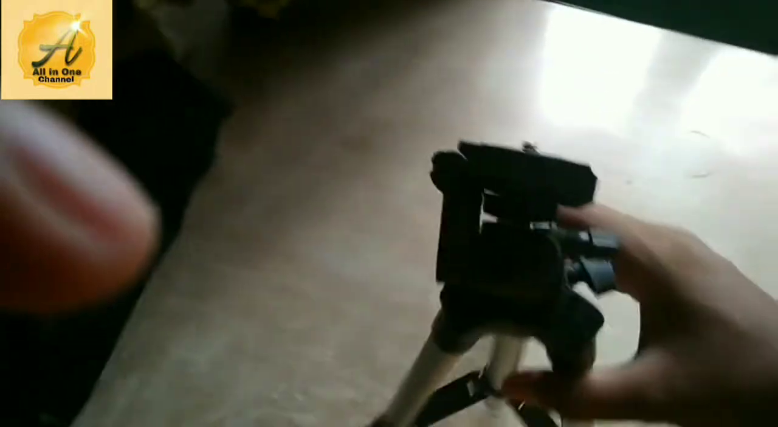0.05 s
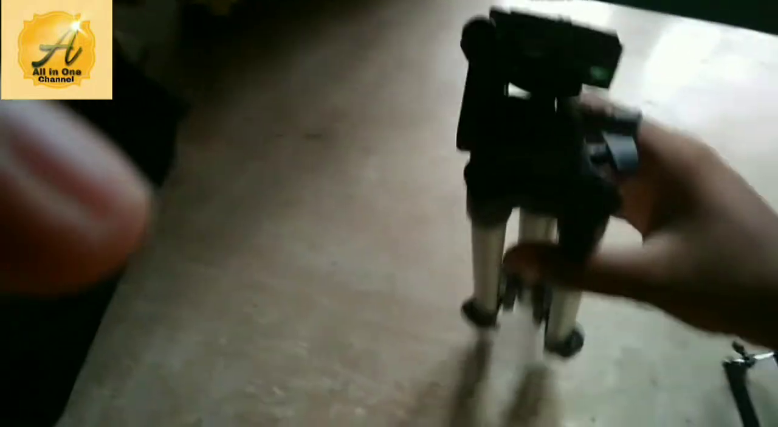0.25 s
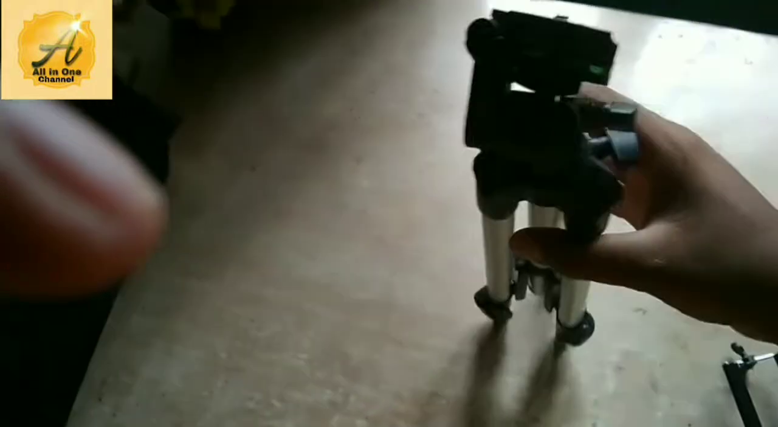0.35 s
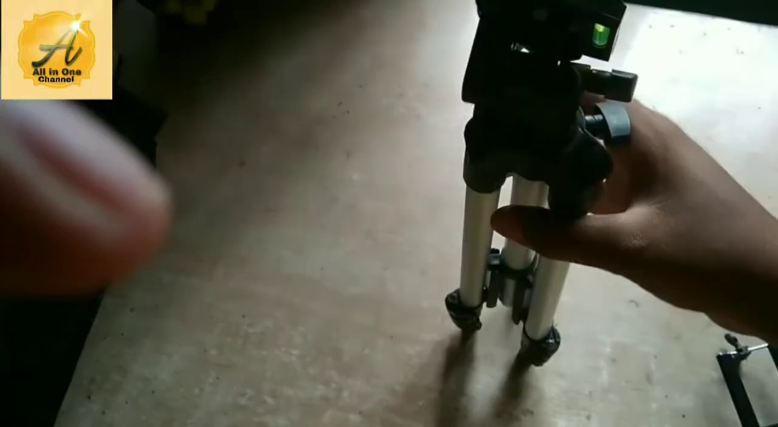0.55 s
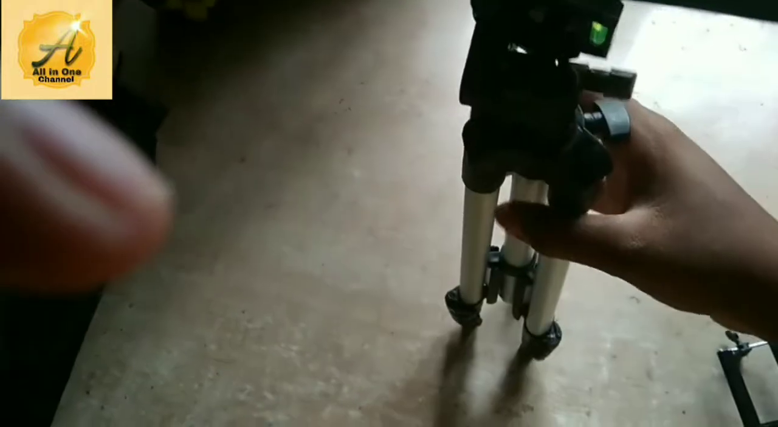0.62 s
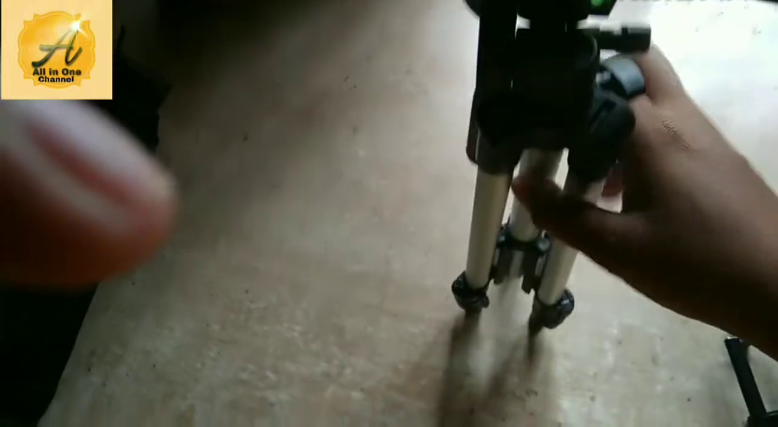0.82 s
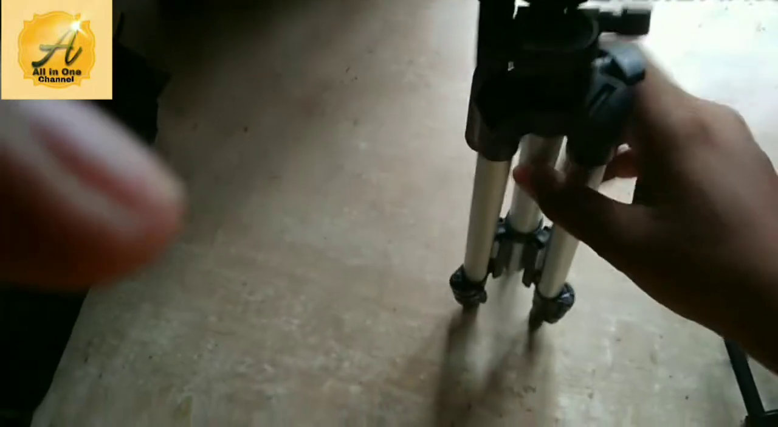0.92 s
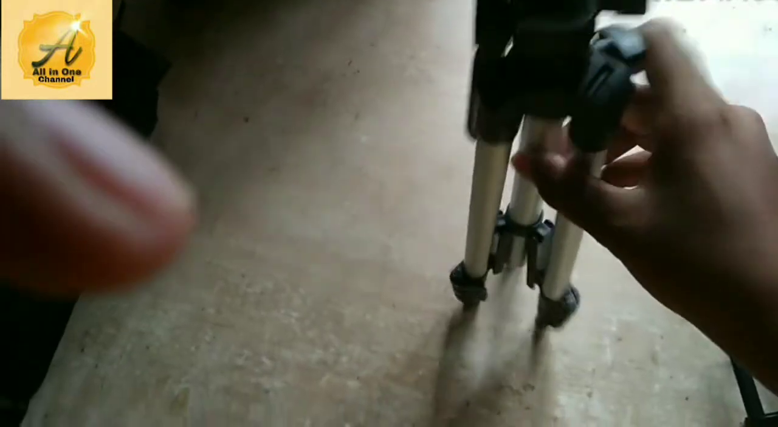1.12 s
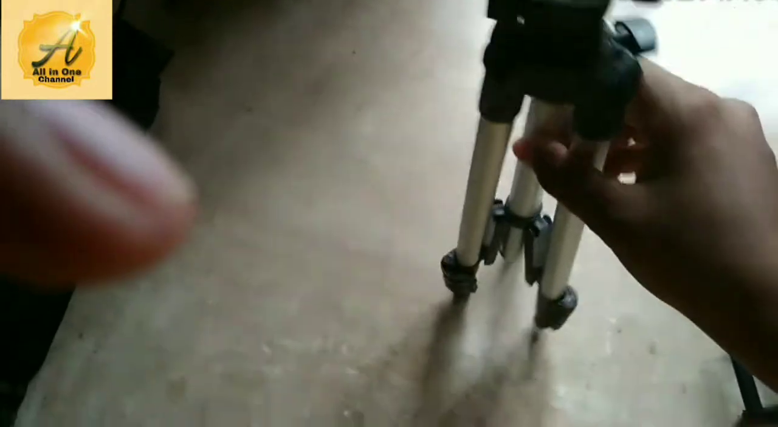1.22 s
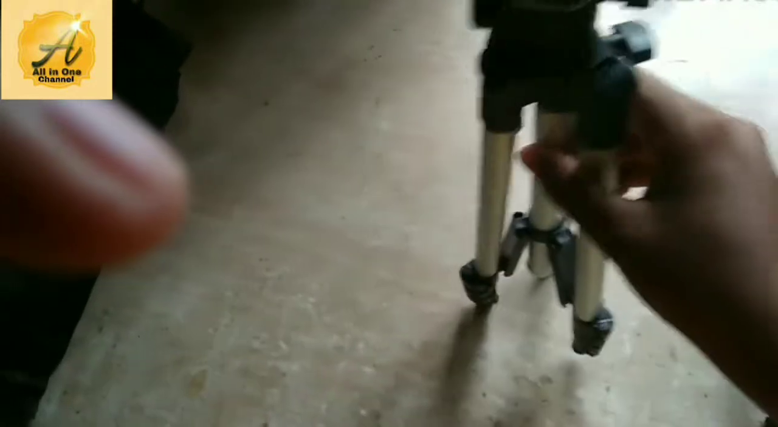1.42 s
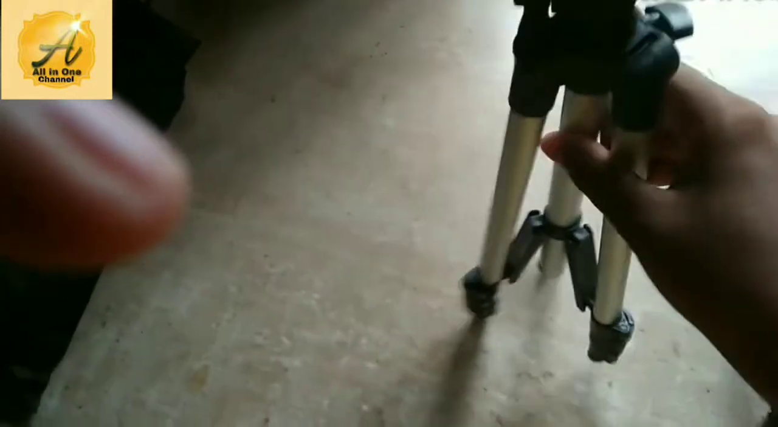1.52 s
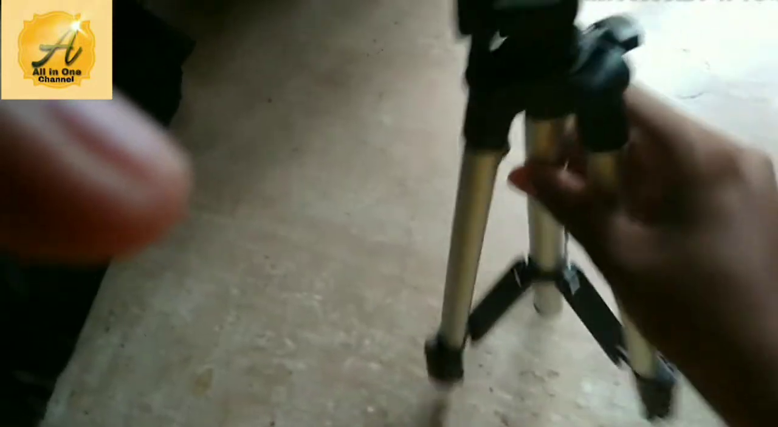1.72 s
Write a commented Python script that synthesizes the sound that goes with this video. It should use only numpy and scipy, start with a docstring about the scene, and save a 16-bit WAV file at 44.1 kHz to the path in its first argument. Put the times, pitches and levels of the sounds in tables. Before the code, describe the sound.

Tripod feet knock repeatedly onto a tabletop in a quiet room, with faint chirps outside.

```python
"""A small tripod is folded and stood on a table in a quiet room.
It sways and scrapes in the hand, then its metal legs clack together. The rubber feet thump down
repeatedly, loose joints tick and the table top booms until the hand's grip stills it.
A bird outside gives two falling chirps, with a soft bump and more scraping around the second.
Mains hum, buzzing hiss and a thin whine lie underneath throughout."""
import sys
import numpy as np
from scipy import signal
from scipy.fft import rfft, irfft, next_fast_len
from scipy.io import wavfile

SR = 44100
rng = np.random.default_rng(int(sys.argv[2]) if len(sys.argv) > 2 else 0)


def store_wav(level_fs):
    """Save 16-bit WAV to argv[1]."""
    pcm = np.round(np.clip(np.atleast_2d(level_fs), -1, 1) * 32767)
    wavfile.write(sys.argv[1], SR, pcm.T.astype(np.int16))


N = 77175
T = np.arange(N) / SR

# foot landings: (time [s], thud level [dB], thud pitch [Hz], table level [dB], contact [s])
LANDINGS = [(0.233, -15, 72.7, -34.5, 0.0069), (.330, -19, 80.4, -38.5, 0.0048),
            (.384, -28, 131, -38, 0.0041), (0.4103, -21.5, 280, -51, 0.00033),
            (.416, -11, 162, -32.5, 0.00397), (.424, -13.5, 278, -55, 0.0066),
            (.457, -16.5, 195, -48, 0.0057), (0.471, -15, 55.8, -29.5, 0.008),
            (0.506, -18, 60, -38, 0.0061), (0.531, -26, 100, -43, 0.0017), (.599, -5.5, 130.7, -28, 0.0017),
            (.619, -40, 189, -33, .0014), (.629, -14.5, 110, -40.5, 0.0026),
            (0.662, -13, 76, -36.5, 0.0041), (0.781, -39, 101, -44, 0.0047), (0.877, -36, 123, -64, 0.0011),
            (1.501, -32.5, 119, -52.5, 0.0032), (1.521, -52, 123, -61.5, .002)]
# table top: (frequency [Hz], gain [dB], t60 [s])
TABLE_MODES = [(58.67, -4, 0.56), (97, -22, 0.19), (106.4, -2.5, 0.73), (148, -3.5, 0.26),
               (172.6, -14.5, 0.75), (264, -8, 0.1), (309, -13, 0.13), (381.4, 0, 0.26), (414, -4.5, 0.083),
               (440.5, -4.5, 0.16), (532, -8, 0.11), (686, -8.5, 0.057), (749, -13, 0.13), (847, -9, 0.064)]
# hollow first touch of a foot: (time [s], level [dB], pitch [Hz])
KNOCKS = [(0.4109, -36.5, 682), (.6005, -41.5, 741)]
THUD_T60_CYCLES, GRIP_START_S, GRIP_DB_PER_S = 4.14, 0.91, 200


def feet():
    """Each landing gives a dead thud and rings the table; shorter contacts reach higher modes."""
    thuds = sum(from_db(db) * ring(push(s, .5 / hz), hz, THUD_T60_CYCLES / hz)
                for s, db, hz, _, _ in LANDINGS)
    force = sum(from_db(db) * push(s, contact_s) for s, _, _, db, contact_s in LANDINGS)
    split_force = force * [T < GRIP_START_S, T >= GRIP_START_S]
    early, late = sum((-1) ** k * from_db(db) * ring(split_force, hz, t60)
                      for k, (hz, db, t60) in enumerate(TABLE_MODES))
    table = early * from_db(-GRIP_DB_PER_S * np.maximum(T - GRIP_START_S, 0)) + late
    knocks = sum(from_db(db) * ring(push(s, .5 / hz), hz, t60=.053) for s, db, hz in KNOCKS)
    dry = butter(butter(thuds, 340, "low") + table + knocks, 48.4, "high", order=4)
    return dry + room(dry, gain_db=-10.5)


# leg-on-leg hits: (time [s], level [dB])
CLACKS = [(.2488, -37.5), (.2523, -36.5), (.2585, -42), (.2612, -43), (.2655, -43)]
# clack spectrum: (frequency [Hz], gain [dB])
CLACK_COLOUR = [(250, -8), (450, 4.5), (620, 0.5), (850, 0), (1300, -5.5), (2300, -4), (4200, -14),
                (6000, -9.5), (7400, -13), (11000, -22), (15000, -11)]
# leg tube modes, then a 15 kHz microphone resonance: (frequency [Hz], gain [dB], t60 [s])
CLACK_MODES = [(490, -3, .07), (850, -6, .06), (1108, -6, .08), (1272, -7, .08), (1900, -7, .06),
               (2304, -1, .1), (2670, -4, .1), (5265, -6, .16), (5800, 3, .06), (6751, -9, .06),
               (7467, -10, .08), (15000, -4, .24)]
CLACK_RING_DB = -21


def legs():
    """The legs clack together, ringing their tubes and setting off a thin 15 kHz microphone ring."""
    clicks = sum(from_db(db) * push(s, 3 / SR) for s, db in CLACKS)
    ringing = sum(from_db(db + CLACK_RING_DB) * ring(clicks, hz, t60) for hz, db, t60 in CLACK_MODES)
    dry = coloured(cracks(CLACKS, t60=.029), CLACK_COLOUR) + ringing
    return dry + room(dry, gain_db=-6.5)


# joint ticks: (time [s], level [dB], low-pass [Hz])
TICKS = [(0.414, -57, 9300), (0.6004, -48, 11500)]
# tick spectrum: (frequency [Hz], gain [dB])
TICK_COLOUR = [(500, 9), (1200, 1.5), (2700, -9), (4500, -15), (5600, -20), (6800, -12.5), (8500, -13.5),
               (11500, -9)]
PING_DB = -1.5


def joints():
    """Loose joints tick as the feet land, each with a very short ping."""
    bursts = sum(butter(cracks([(s, db)], t60=.041), hz, "low", order=8) for s, db, hz in TICKS)
    clicks = sum(from_db(db + PING_DB) * push(s, 3 / SR) for s, db, _ in TICKS)
    ping = ring(clicks, hz=6850, t60=.012)
    ticks = coloured(bursts, TICK_COLOUR)
    return ticks + ping + room(ticks, gain_db=3.5)


# leg slides: (start [s], length [s], level [dB], squeak [Hz])
SLIDES = [(-.04, 0.1, -62, 1740), (0.307, 0.22, -66.5, 2370), (0.5, 0.078, -69, 1900),
          (1.461, 0.034, -68, 776), (1.495, 0.034, -66, 2000), (1.54, 0.11, -67, 1360)]
# scrape spectrum: (frequency [Hz], gain [dB])
SCRAPE_COLOUR = [(200, 12.5), (750, 15.5), (1100, 7.5), (1800, 17.5), (2500, 4.5), (3200, 13.5),
                 (4500, -23.5), (9000, -3.5)]
GRAINS_PER_S, SQUEAK_T60_S, SQUEAK_DB = 1500, .006, 1
OVERTONE_RATIO, OVERTONE_DB = 1.89, -13


def slides():
    """Legs slide in their braces: dense friction grains scrape and excite a faint squeak."""
    grains = rms_one((rng.random(N) < GRAINS_PER_S / SR) * rng.standard_normal(N))
    scrape = coloured(grains, SCRAPE_COLOUR)
    dry = 0
    for s, length_s, db, hz in SLIDES:
        overtone = from_db(OVERTONE_DB) * ring(grains, hz * OVERTONE_RATIO, SQUEAK_T60_S)
        squeak = from_db(SQUEAK_DB) * rms_one(ring(grains, hz, SQUEAK_T60_S) + overtone)
        dry += from_db(db) * arch(s, length_s) * (scrape + squeak) / 2
    return dry + room(dry)


# hand rubs: (start [s], length [s], level [dB])
RUBS = [(0.26, 0.32, -57), (0.638, 0.39, -63.5), (1.339, 0.056, -62), (1.457, 0.037, -58.5),
        (1.56, 0.61, -62)]
# rub spectrum: (frequency [Hz], gain [dB])
RUB_COLOUR = [(100, 6), (350, 4.5), (550, 3), (800, 2.5), (1300, -25), (1600, -8.5), (3500, -27),
              (8000, -30)]
SWAY_DB, SWAY_HZ = -51, 49.6


def hand():
    """The carried stand sways with a low flutter; the hand rubs on it in swells of noise."""
    sway = from_db(SWAY_DB) * arch(start_s=-.02, length_s=.14) * np.sin(2 * np.pi * SWAY_HZ * T)
    swells = sum(from_db(db) * arch(s, length_s) for s, length_s, db in RUBS)
    return sway + swells * coloured(rng.standard_normal(N), RUB_COLOUR)


# calls: (fall start [s], level [dB], final pitch [Hz], upper voice gain [dB])
CHIRPS = [(1.181, -66.5, 2029, -2), (1.594, -61.5, 2170, -3.5)]
# effort through a call: (time from fall start [s], gain [dB])
CHIRP_EFFORT = [(0, 2), (.02, -2.5), (.035, -8), (.058, 6.5), (.09, -1), (.12, -2), (.19, 2)]
FALL_TOP_HZ, FALL_TAU_S = 3780, .036
ATTACK_S, RELEASE_START_S, CHIRP_S = .0057, .189, .199
LEAD_S, LEAD_START_HZ, LEAD_END_HZ, LEAD_DB = .077, 3365, 4340, -12.5
UPPER_RATIO, UPPER_FADE_DB_PER_S = 1.26, 48


def bird():
    """A faint rising note, then a raspy two-voiced whistle that falls and levels out."""
    dry = 0
    for s, db, end_hz, upper_db in CHIRPS:
        t = np.maximum(T - s, 0)
        fall_hz = end_hz + (FALL_TOP_HZ - end_hz) * np.exp(-t / FALL_TAU_S)
        gate = np.interp(t, [0, ATTACK_S, RELEASE_START_S, CHIRP_S], [0, 1, 1, 0])
        effort = from_db(np.interp(t, *np.transpose(CHIRP_EFFORT)))
        lower = whistle(fall_hz, rasp=.04)
        upper = from_db(upper_db - UPPER_FADE_DB_PER_S * t) * whistle(fall_hz * UPPER_RATIO, rasp=.08)
        lead_hz = np.interp(T - s, [-LEAD_S, 0], [LEAD_START_HZ, LEAD_END_HZ])
        lead = np.sqrt(np.abs(arch(s - LEAD_S, LEAD_S))) * whistle(lead_hz, rasp=0)
        dry += from_db(db) * (gate * effort * (lower + upper) + from_db(LEAD_DB) * lead)
    return from_db(-1) * dry + room(dry, gain_db=-2)


def whistle(hz, rasp, tremble_hz=450):
    """A sine whose pitch trembles at random; rasp is the relative rms deviation."""
    tremble = 1 + rasp * rms_one(butter(rng.standard_normal(N), tremble_hz, "low"))
    return np.sin(2 * np.pi * np.cumsum(hz * tremble) / SR)


# room noise spectrum: (frequency [Hz], gain [dB])
AIR_COLOUR = [(20, -35), (45, 1), (150, 0.5), (220, -8), (350, -6), (520, -14), (780, -11), (1300, -16.5),
              (2200, -22.5), (4000, -28.5), (7000, -36), (14000, -39.5)]
# mains hum: (harmonic number, rms level [dB])
HUM_HARMONICS = [(1, -70), (3, -68), (5, -74.5), (7, -77.5)]
AIR_DB, MAINS_HZ, BUZZ_DEPTH = -62, 50.2, .47
WHINE_HZ, WHINE_DB, WHINE_DEPTH = 15050, -76, .6


def background():
    """Room noise and mains hum; the hiss and a thin electrical whine pulse at twice the mains rate."""
    air = from_db(AIR_DB) * coloured(rng.standard_normal(N), AIR_COLOUR)
    pulse = np.sin(4 * np.pi * MAINS_HZ * T)
    buzz = BUZZ_DEPTH * pulse * butter(air, 2500, "high", order=1)
    hum = sum(np.sqrt(2) * from_db(db) * np.sin(2 * np.pi * (k * MAINS_HZ * T + rng.random()))
              for k, db in HUM_HARMONICS)
    whine = rms_one(ring(rng.standard_normal(N), WHINE_HZ, t60=.016)) * (1 + WHINE_DEPTH * pulse)
    whine = butter(whine, [WHINE_HZ - 450, WHINE_HZ + 450], "band")
    return air + buzz + hum + from_db(WHINE_DB) * whine


# room decay: (frequency [Hz], t60 [s])
ROOM_T60 = [(100, .38), (500, .32), (2500, .33), (4200, .24), (7000, .26), (15000, .25)]
ROOM_ONSET_S = .0045


def room(x, gain_db=0):
    """Diffuse tail that dies faster in the treble."""
    edges_hz = np.geomspace(40, 18000, 10)
    tail = 0
    for low, high in zip(edges_hz, edges_hz[1:]):
        band = butter(rng.standard_normal(N), [low, high], "band", order=4)
        tail += band * from_db(-60 * T / at_hz(ROOM_T60, np.sqrt(low * high)))
    tail *= 1 - np.exp(-(T / ROOM_ONSET_S) ** 2)
    return from_db(gain_db) * signal.fftconvolve(x, tail / np.linalg.norm(tail))[:N]


def cracks(hits, t60):
    """A fast-dying burst of noise for each hard contact."""
    envelope = sum((T >= s) * from_db(db - 60 * np.maximum(T - s, 0) / t60) for s, db in hits)
    return rng.standard_normal(N) * envelope


def push(start_s, length_s):
    """Contact force of unit impulse."""
    force = arch(start_s, length_s) ** 2
    return force / (force.sum() + 1e-12)


def arch(start_s, length_s):
    """Half a sine, zero elsewhere."""
    return np.sin(np.pi * np.clip((T - start_s) / length_s, 0, 1))


def ring(x, hz, t60):
    """One mode: a unit click starts a decaying sine of height 1."""
    radius, angle = from_db(-60 / (t60 * SR)), 2 * np.pi * hz / SR
    return signal.lfilter([0, np.sin(angle)], [1, -2 * radius * np.cos(angle), radius ** 2], x + 1e-18)


def coloured(x, colour):
    """Minimum-phase filter with the given spectrum and unit power gain."""
    size = 2 * next_fast_len(N)
    gain = rms_one(from_db(at_hz(colour, np.fft.rfftfreq(size, 1 / SR))))
    cepstrum = irfft(np.log(gain))
    cepstrum[1:size // 2] *= 2
    cepstrum[size // 2 + 1:] = 0
    return irfft(rfft(x, size) * np.exp(rfft(cepstrum)))[:N]


def butter(x, hz, kind, order=2):
    """Butterworth filter."""
    return signal.sosfilt(signal.butter(order, hz, kind, fs=SR, output="sos"), x)


def at_hz(points, hz):
    """Read a table on a log-frequency axis."""
    points_hz, values = np.transpose(points)
    return np.interp(np.log(np.maximum(hz, 1)), np.log(points_hz), values)


def rms_one(x):
    """Scale to unit rms."""
    return x / np.sqrt(np.mean(x ** 2) + 1e-20)


def from_db(db):
    """Decibels to gain."""
    return 10 ** (np.asarray(db) / 20)


def scene():
    """All sources, mono."""
    return (legs() + feet() + joints() + slides() + hand() + bird() + background())[None]


def record(dry):
    """Steep low-pass at 15.6 kHz."""
    return signal.sosfilt(signal.ellip(12, .2, 80, 15600, fs=SR, output="sos"), dry)


dry = scene()
out = record(dry)
store_wav(out)
```